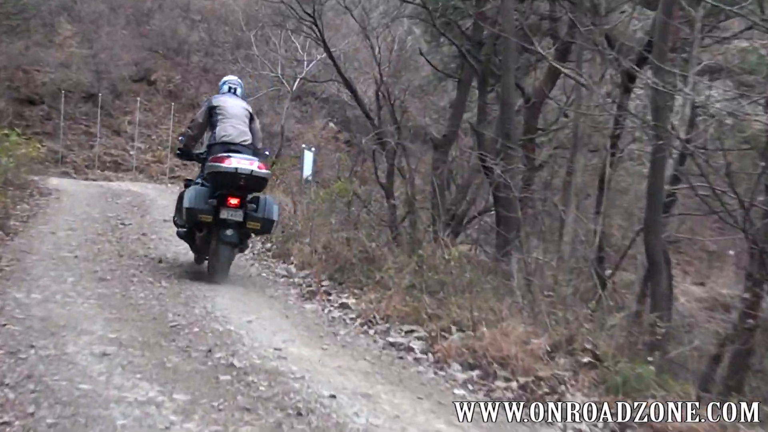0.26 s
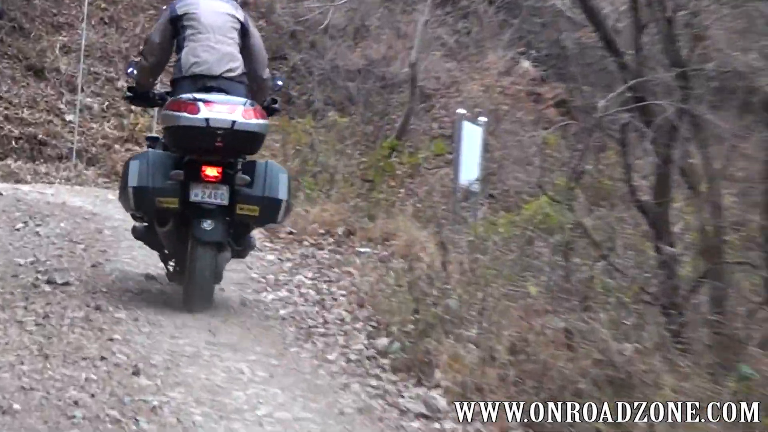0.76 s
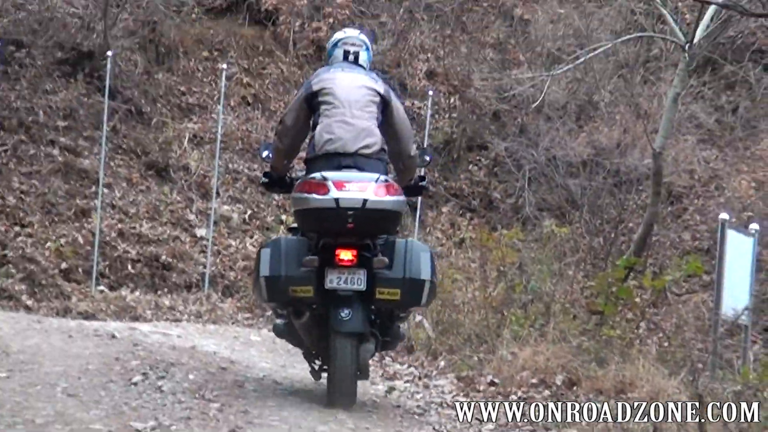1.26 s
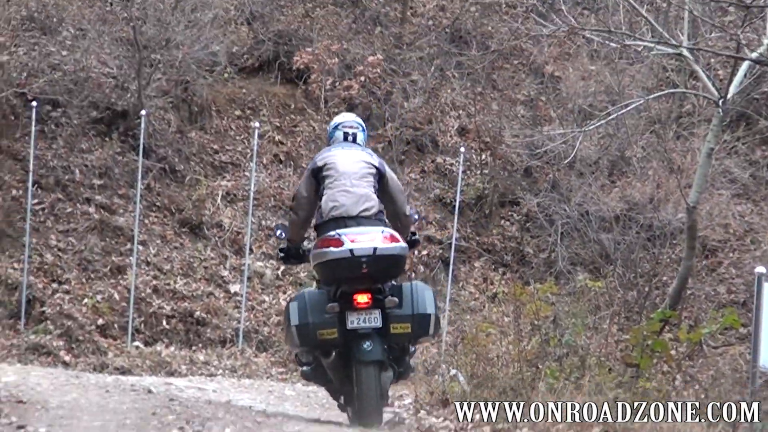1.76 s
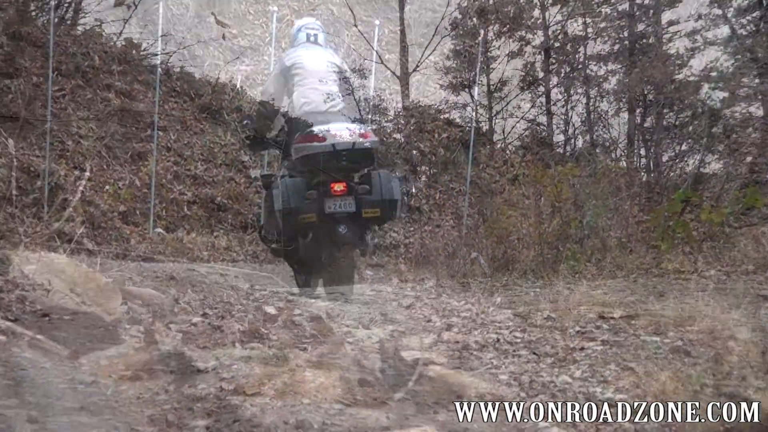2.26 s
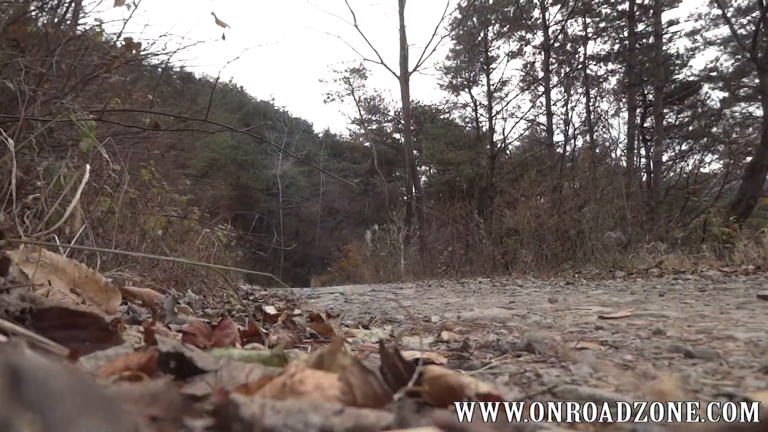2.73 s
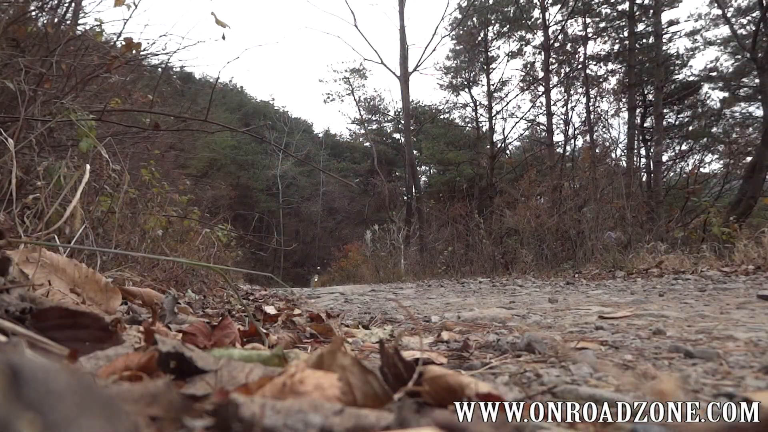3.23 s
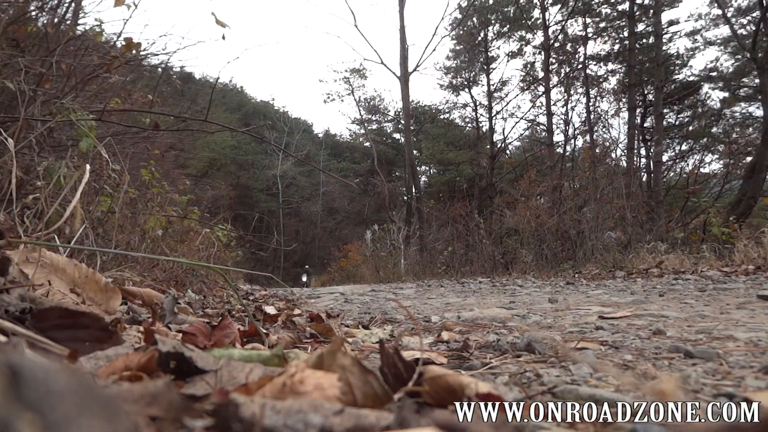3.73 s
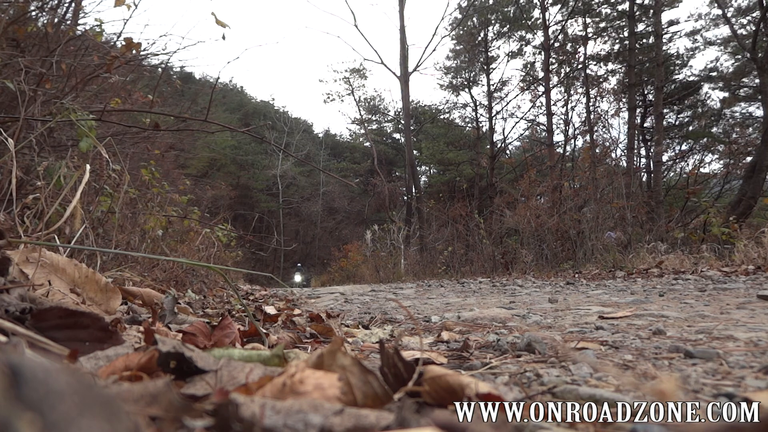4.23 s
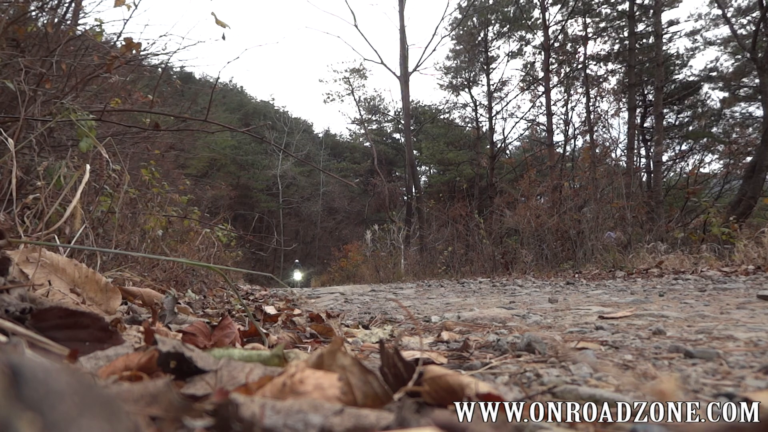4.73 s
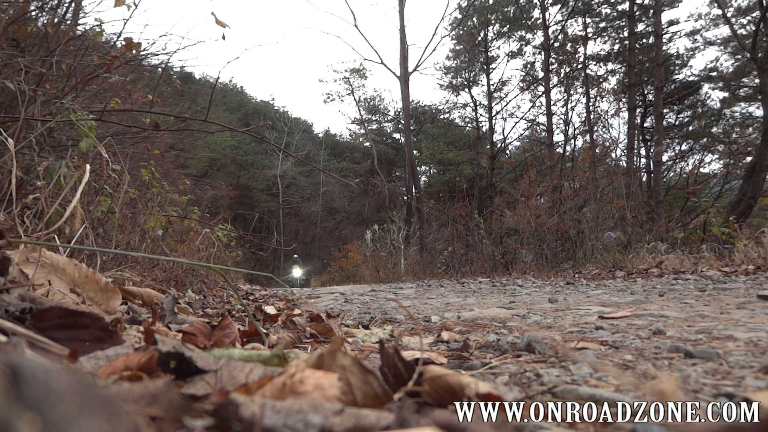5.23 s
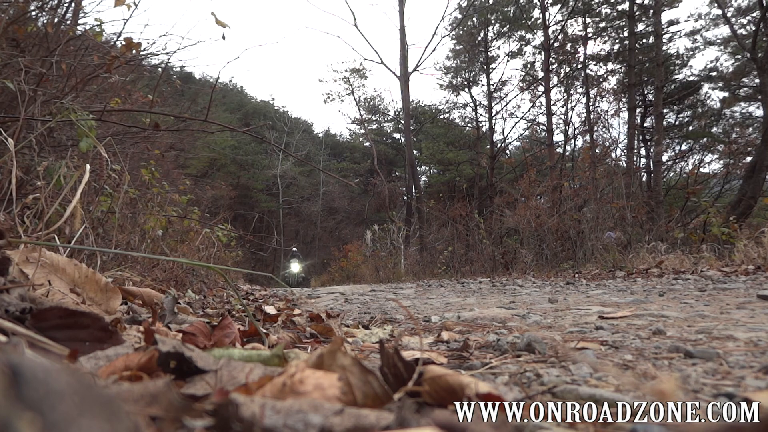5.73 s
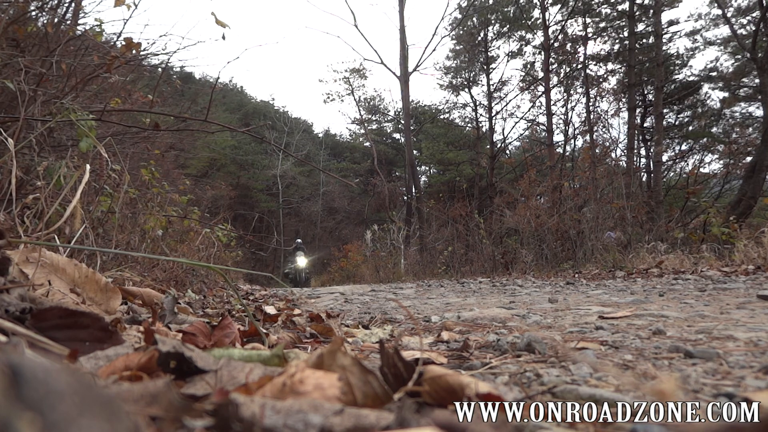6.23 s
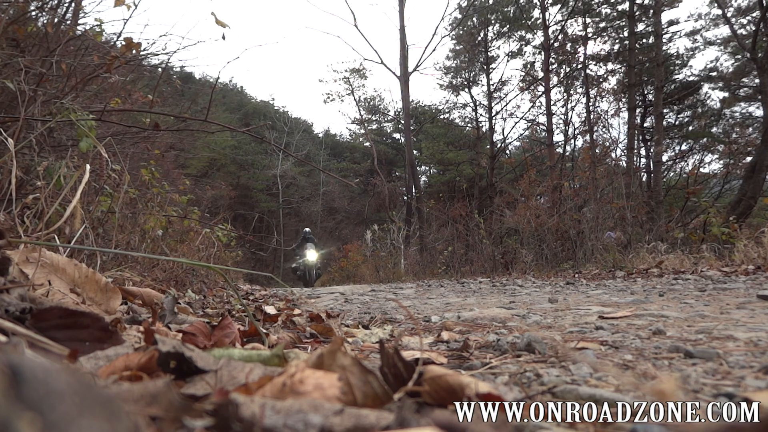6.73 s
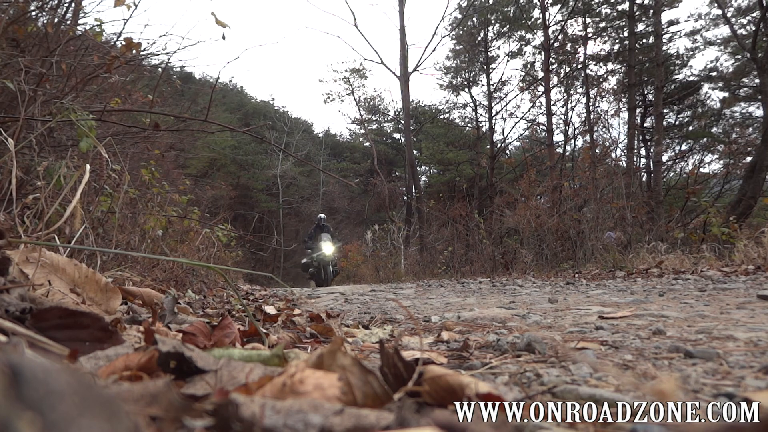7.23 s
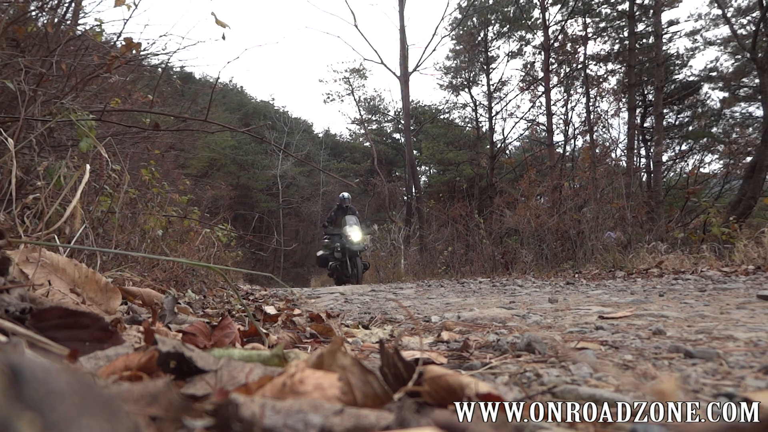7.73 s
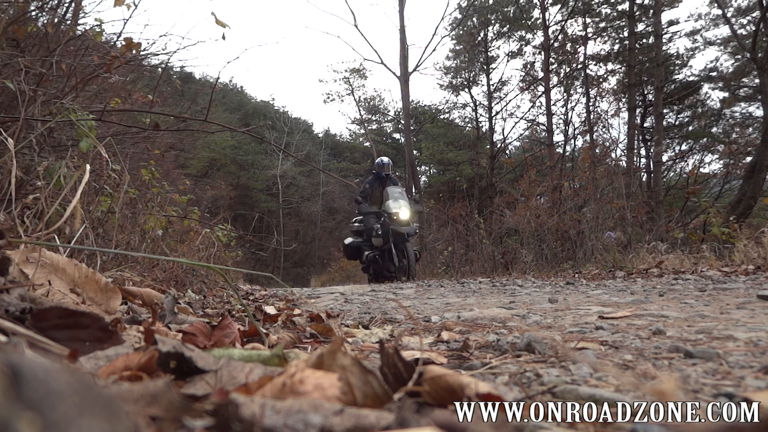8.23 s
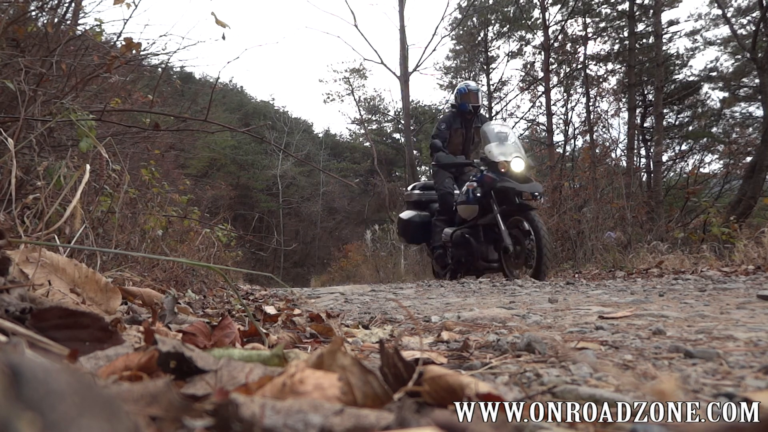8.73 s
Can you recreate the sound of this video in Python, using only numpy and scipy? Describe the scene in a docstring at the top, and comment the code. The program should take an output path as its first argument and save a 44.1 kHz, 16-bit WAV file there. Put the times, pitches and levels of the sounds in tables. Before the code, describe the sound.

A twin-cylinder motorcycle thumps away along a gravel track, then another ride approaches from far off as twigs snap close by.

```python
"""A twin-cylinder motorcycle rides away down a forest gravel track in a light wind, revs falling. Its exhaust
thumps and barks, the gears whine, metal knocks, and the tyres crunch gravel and flick stones.
From 1.86 to 2.78 s this dissolves, under a faint steady whine, into a second ride from far off.
Twigs snap close by, loudest near 4 s, while the bike revs gently and then eases back.
Near the end it comes out of the trees, its exhaust more direct and the gravel louder as it nears."""
import sys
import numpy as np
from scipy import signal
from scipy.fft import rfft, irfft, next_fast_len
from scipy.io import wavfile
from scipy.ndimage import map_coordinates

SR = 44100
rng = np.random.default_rng(int(sys.argv[2]) if len(sys.argv) > 2 else 0)


def materialize(psi):
    """Save the field psi as 16-bit PCM at rate SR to the path in sys.argv[1].

    A 1-D psi becomes a single channel; in a 2-D psi each row is a channel.
    """
    bounded = np.clip(np.atleast_2d(psi).T, -1, 1)
    quanta = np.round(bounded * 32767).astype(np.int16)
    wavfile.write(sys.argv[1], SR, quanta)


N = 395577
TIME = np.arange(N) / SR
DISSOLVE_START_S, DISSOLVE_END_S = 1.86, 2.78

# How hard the engine pulls on each ride. Each row: time in seconds, throttle in dB,
# second cylinder against the first in dB.
THROTTLE_AWAY = [(0, -1, -4.5), (.8, 0.5, -5), (1.15, -1, -8.5), (2.25, 1, -17.5), (2.5, 1.5, -5)]
THROTTLE_TOWARD = [(3.2, -7.5, -11), (3.75, -3, 0), (5, -0.5, -11), (7.1, 3.5, -12.5), (7.45, -1, -8.5),
                   (7.8, 1.5, -18), (8.97, -0.5, -10)]


def amp(db):
    """Decibels to gain."""
    return 10 ** (np.asarray(db) / 20)


def unit(x):
    """Scale to rms 1."""
    return x / np.sqrt(np.mean(x ** 2) + 1e-20)


def along(points, hz):
    """Read (Hz, value) points on a log frequency axis."""
    point_hz, values = np.transpose(points)
    return np.interp(np.log(hz + 1), np.log(point_hz + 1), values)


def curves(rows):
    """An automation curve for each column after the time."""
    times, *columns = np.transpose(rows)
    return [np.interp(TIME, times, column) for column in columns]


def wobble(rate):
    """A smooth random curve, rate knots a second."""
    return map_coordinates(rng.standard_normal(int(N * rate / SR) + 4), [TIME * rate])


def lift_db(modes, hz):
    """The boost or cut from a set of bell-shaped bands."""
    return sum(db / (1 + (2 * (hz - centre) / width) ** 2) for centre, width, db in modes)


def filtered(x, response):
    """Apply a frequency response to x."""
    size = next_fast_len(x.shape[-1] + SR // 4)
    return irfft(rfft(x, size) * response(np.fft.rfftfreq(size, 1 / SR)), size)[..., :x.shape[-1]]


def coloured(x, spectrum):
    """Shape x with an EQ curve of (Hz, dB) points, at rms 1."""
    return unit(filtered(x, lambda hz: amp(along(spectrum, hz))))


def spread(pair, side_db):
    """Two unrelated signals as the mid and side of a stereo pair."""
    return pair[0] + amp(side_db) * np.array([pair[1], -pair[1]])


def placed(x, left_db, lead_us):
    """A sound from one side is louder and earlier in that channel."""
    sides = np.array([[1], [-1]]) / 2
    return filtered(x, lambda hz: amp(sides * left_db) * np.exp(2j * np.pi * hz * sides * lead_us / 1e6))


def add(track, start_s, sound):
    """Mix a short sound into the track."""
    part = track[max(0, round(start_s * SR)):][:len(sound)]
    part += sound[:len(part)]


def dissolve(away, toward):
    """The first ride fades out evenly as the second fades in."""
    share = np.interp(TIME, [DISSOLVE_START_S, DISSOLVE_END_S], [0, 1])
    return away * (1 - share) + toward * share


def closeness():
    """How far the second ride has come out of the trees, 0 to 1."""
    return np.interp(TIME, [6.7, 7.9], [0, 1])


def forest_air():
    """A faint, steady bed of dark noise."""
    spectrum = [(20, -19), (70, -1), (150, 11.5), (800, -0.5), (3000, -4), (6000, -9.5), (15000, -30)]
    return amp(-60) * spread(coloured(rng.standard_normal((2, N)), spectrum), side_db=-3.5)


def breeze():
    """A light, gusting wind rumbles on the microphones."""
    # The wind's strength between gusts. Each row: time in seconds, level in dB.
    wind = [(0, -25), (.9, -34), (1.08, -31), (2.13, -32), (2.3, -32)]
    spectrum = [(10, 5.5), (30, -13.5), (80, -6.5), (160, -6.5), (500, -52)]
    rumble = coloured(rng.standard_normal((2, N)), spectrum)
    return amp(curves(wind)[0] + 2 * wobble(6.1)) * spread(rumble, side_db=-6)


def faint_whine(pitch_hz=868, width_hz=60):
    """A narrow band of noise at a steady pitch hangs over the dissolve."""
    # Its swell and fade. Each row: time in seconds, level in dB.
    fader = [(1.8, -87), (2.2, -53), (2.75, -67), (3.4, -63), (4, -90)]
    phase = 2 * np.pi * pitch_hz * TIME
    whine = wobble(width_hz) * np.cos(phase) + wobble(width_hz) * np.sin(phase)
    return amp(curves(fader)[0]) * unit(whine)


def forest_echo(x, lowest_hz, hops=7):
    """Trunks and hillside scatter a tail that changes as the bike moves; long waves pass them by."""
    # The tail's length. Each row: frequency in Hz, seconds to fall 60 dB.
    decay = [(100, 1), (400, 0.45), (2000, 0.16), (10000, 0.056)]
    scattered = filtered(x, lambda hz: hz ** 2 / (hz ** 2 + lowest_hz ** 2))
    scattered = np.pad(scattered, (300, 0))[:N]  # 7 ms of pre-delay
    out, hop = np.zeros((2, N + 2 * SR)), N // hops + 1
    for start in range(-hop, N, hop):  # a fresh tail for each overlapping stretch
        at = np.arange(max(start, 0), min(start + 2 * hop, N))
        hz, t, noise = signal.stft(rng.standard_normal((2, SR // 2)), SR, nperseg=256)
        tail = signal.istft(noise * amp(-60 * t / along(decay, hz)[:, None]), SR, nperseg=256)[1]
        tail = spread(tail / np.linalg.norm(tail[0]), side_db=-13)
        window = np.sin(np.pi * (at - start) / (2 * hop))
        wet = signal.fftconvolve((scattered[at] * window)[None], tail, axes=1)
        out[:, at[0]:at[0] + wet.shape[1]] += wet
    return out[:, :N]


def twig_snaps(width_cycles=0.57, tail_db=-11, tail_s=0.0016, lowest_hz=500):
    """Twigs and dry leaves snap: each a tiny pitched click with a faint scatter off the ground."""
    # Each row: time in seconds, level in dB, pitch in Hz.
    snaps = [(2.807, -35.5, 4880), (3.946, -8, 1540), (4.246, -31, 4740)]
    out, t = np.zeros(N), TIME[:SR // 12] - .002  # the click is centred on t = 0
    for s, db, pitch_hz in snaps:
        click = -np.sin(2 * np.pi * pitch_hz * t) * np.exp(-(t * pitch_hz / width_cycles) ** 2)
        noise = rng.standard_normal(len(t))
        scatter = unit(filtered(noise, lambda hz: 1 / (1 + 3 * np.log2((hz + 1) / pitch_hz) ** 4)))
        tail = amp(tail_db) * scatter * (t > 0) * np.exp(-abs(t) / tail_s)
        add(out, s + t[0], amp(db) * (click + tail))
    return filtered(out, lambda hz: hz ** 2 / (hz ** 2 + lowest_hz ** 2))


def ground_dip(x):
    """The bounce off the track cancels a band that moves with the angle to the tyres."""
    # The dip riding away, far ahead and close ahead. Each row: centre in Hz, width in Hz, gain in dB.
    dip_away = [(1450, 600, -6)]
    dip_far = [(4050, 2900, -3.5)]
    dip_near = [(5360, 1220, -10)]
    away, far, near = (filtered(x, lambda hz: amp(lift_db(dip, hz)))
                       for dip in (dip_away, dip_far, dip_near))
    return np.where(TIME < DISSOLVE_END_S, away, far + (near - far) * closeness())


def tyre_gains(layers, throttle, metres, drive):
    """Rumble, crunch and grit fall with distance; the first two also follow throttle and ground."""
    # Loose or packed gravel. Each row: centre and length in seconds, rumble and crunch change in dB.
    patches = [(1.315, 0.058, -9, 6.5), (1.79, 0.11, -6, 3), (2.414, 0.9, -3, -6.5), (6.11, 0.22, 4.5, -3),
               (6.29, 0.14, 5.5, 2), (6.484, 0.17, 0, -11), (6.688, 0.12, 1.5, 2), (6.93, 0.035, 3, -11),
               (7.083, 0.26, -1.5, 1.5), (7.314, 0.13, 4.5, 4.5), (7.496, 0.21, 4, 4),
               (7.616, 0.15, 3, 6.5), (8.21, 0.06, 2, 6), (8.654, 0.028, 8.5, 7.5), (8.76, 0.13, 2, 4)]
    rumble_db, crunch_db, grit_db = (db - loss_db * np.log2(metres / 10) for db, loss_db in layers)
    drive_db = drive * curves(throttle)[0]
    for s, length_s, extra_rumble_db, extra_crunch_db in patches:
        swell = np.exp(-(2 * (TIME - s) / length_s) ** 2)
        rumble_db += extra_rumble_db * swell
        crunch_db += extra_crunch_db * swell
    return amp([rumble_db + drive_db, crunch_db + drive_db, grit_db])


def grains(rate, spread_db, life_s):
    """Two streams of tiny stone contacts: mostly faint, a few strong."""
    hits = (rng.random((2, N)) < rate / SR) * amp(spread_db * np.minimum(rng.exponential(size=(2, N)), 4))
    power = signal.fftconvolve(hits ** 2, np.exp(-TIME[None, :SR // 20] / life_s), axes=1)[:, :N]
    return np.sqrt(abs(power)) * rng.standard_normal((2, N))


def tyres(rumble_gain, crunch_gain, grit_gain, first_cutoff_hz=10500, second_cutoff_hz=13000):
    """Rolling on gravel: dull rumble, clumpy crunch and a low-passed hiss of grit that opens up late."""
    # The colour of each layer. Each row: frequency in Hz, relative level in dB.
    rumble_eq = [(30, -37), (100, -14), (250, -5), (500, 1.5), (800, -5.5), (1100, -2), (1400, -10.5),
                 (2200, -12.5), (5000, -34)]
    crunch_eq = [(500, -20.5), (1200, -0.5), (1600, 0.5), (2050, 2.5), (2500, -7.5), (3100, -4),
                 (4200, -11.5), (5500, -15.5), (7500, -22), (10000, -20.5), (15000, -99)]
    grit_eq = [(3000, -2), (5300, 6), (6500, 2.5), (8500, 0.5), (10500, 1), (12300, 4.5), (15000, 5),
               (16000, -3)]
    clumps = wobble(22)
    rumble = spread(coloured(grains(rate=450, spread_db=1.5, life_s=0.0055), rumble_eq), side_db=-7)
    crunch = spread(coloured(grains(rate=380, spread_db=2.3, life_s=0.003), crunch_eq), side_db=-10)
    grit = spread(coloured(grains(rate=1900, spread_db=1, life_s=0.0046), grit_eq), side_db=-36.5)
    dull = filtered(grit, lambda hz: 1 / (1 + (hz / first_cutoff_hz) ** 8))
    brighter = filtered(grit, lambda hz: 1 / (1 + (hz / second_cutoff_hz) ** 16))
    return (rumble_gain * amp(0.43 * clumps) * rumble
            + crunch_gain * amp(0.89 * clumps) * crunch
            + grit_gain * dissolve(dull, brighter + (grit - brighter) * closeness()))


def pebbles(crunch_gain, count=48, over_db=9, scatter_db=-2, sharp_db=-11, spray_db=5, lowest_hz=1900):
    """Rows for stones(): small ones flicked at random, their level riding on the crunch around them."""
    rows = []
    for when, smallness, octave in rng.random((count, 3)):
        db = 20 * np.log10(crunch_gain[int(when * N)]) + over_db + scatter_db * smallness
        rows.append((when * N / SR, db, sharp_db, spray_db, lowest_hz * 2 ** octave))
    return rows


def stones(crunch_gain, ring_s=0.0017, spray_s=0.013, clack_db=1.4, crack_db=4.5):
    """Each stone clacks at a pitch set by its size, cracks and sets off a spray of smaller ones."""
    # The largest stones the tyres squeeze out. Each row: start in seconds, relative level in dB,
    # crack trim in dB, spray in dB, ring in Hz.
    large_stones = [(1.035, -9, -7, -44, 1860), (1.211, -18.5, -28, -8, 2900),
                    (1.2938, -17.5, -17, -4, 2180), (1.315, -18, -22, -2, 2500),
                    (1.4524, -23, -16, -22, 4000), (1.4968, -14, -17.5, -8, 2720),
                    (1.5005, -19, -22, -21, 1900), (1.675, -20, -19, -4, 4040), (1.7548, -20, -20, 9, 2490),
                    (1.8106, -22, -14, -13, 3220), (1.851, -21.5, -12.5, -3, 3020),
                    (2.4867, -28, -34, -14, 1070), (6.013, -30.5, -21, -12, 1200),
                    (6.1477, -26.5, -22, -6, 1190), (6.246, -33, -28, -4, 1090),
                    (6.2789, -23.5, -25, -3, 1140), (6.302, -35, -13, -2, 1050),
                    (6.9321, -25, -38, -4, 1170), (7.325, -31, -28, 4, 1700), (7.622, -27, -27, 5, 2100),
                    (7.7543, -22.5, -11, 2, 1910), (8.402, -25, -35, -17, 2210),
                    (8.6422, -19.5, -27, -12, 1790), (8.7545, -17.5, -18, -19, 3800),
                    (8.8214, -13, -29, -17, 1390), (8.904, -13.5, -36, -13, 1510),
                    (8.9395, -11, -15, -2, 1420)]
    # The dull clack and the sharp crack. Each row: frequency in Hz, relative level in dB.
    clack_eq = [(200, -4.5), (700, 6), (1200, 3.5), (2000, -3), (3300, -6.5), (6000, -27), (12000, -40)]
    crack_eq = [(1500, -15), (3500, 0), (6000, 10), (9000, 1), (15000, -38)]
    out, t = np.zeros(N), TIME[:SR // 12]
    for s, db, sharp_db, spray_db, ring_hz in list(large_stones) + pebbles(crunch_gain):
        fade = np.exp(-t / ring_s) + amp(spray_db) * np.exp(-t / spray_s)
        ring = [(ring_hz, 0.63 * ring_hz, 9)]  # a broad 9 dB resonance
        clack = coloured(rng.standard_normal(len(t)), clack_eq)
        clack = fade * filtered(clack, lambda hz: amp(lift_db(ring, hz)))
        crack = fade * coloured(rng.standard_normal(len(t)), crack_eq)
        add(out, s, amp(db + clack_db) * clack / abs(clack).max())
        add(out, s, amp(db + sharp_db + crack_db) * crack / abs(crack).max())
    return out


def metal_knocks(gain_db=5.5):
    """Short metallic knocks ring from the bike as it rides away, their modes in a new balance each time."""
    # The knocks. Each row: start in seconds, relative peak in dB.
    knocks = [(0.2129, -23.5), (0.3368, -15.5), (0.433, -27.5), (0.8259, -22), (0.9886, -24),
              (1.0909, -23.5)]
    # The metal's modes. Each row: pitch in Hz, relative level in dB, seconds to fall 60 dB.
    modes = [(1930, 1, .018), (2090, 0, .016), (2890, -9, .012), (4110, -6, .013), (5700, -13, .009)]
    out, t = np.zeros(N), TIME[:SR // 12]
    for s, db in knocks:
        ring = np.zeros(len(t))
        for hz, mode_db, t60 in modes:
            fade = amp(mode_db + rng.normal(0, 0.75) - 60 * t / t60)
            ring += fade * np.sin(2 * np.pi * hz * t + rng.uniform(0, 2 * np.pi))
        add(out, s, amp(db + gain_db) * ring / abs(ring).max())
    return out


def gears(speed, throttle, metres, first_s, level_db, surge_db, width_hz, drive,
          mesh_ratio=51.5, surge_s=0.012):
    """Meshing teeth give a rasping whine that tracks the revs, surges each cycle and grows with throttle."""
    # The resonance where the gearbox sings. Each row: centre in Hz, width in Hz, boost in dB.
    gearbox = [(1051, 130, 10)]
    rate, = curves(speed)
    turn = 2 * np.pi * np.cumsum(rate) / SR
    whine = wobble(width_hz) * np.cos(mesh_ratio * turn) + wobble(width_hz) * np.sin(mesh_ratio * turn)
    whine_db = level_db + drive * curves(throttle)[0] + lift_db(gearbox, mesh_ratio * rate)
    surge = amp(surge_db * np.cos(turn - np.interp(first_s + surge_s, TIME, turn)))
    return amp(whine_db) * 10 / metres * unit(whine * surge)


def firings(speed, throttle, metres, first_s, lag_cycles, scatter_db):
    """Two firings a cycle, the second weaker, less steady and a little late; both fall with distance."""
    # Firings that fail to catch. Each row: time in seconds, level change in dB.
    misfires = [(.175, -8), (.745, -15), (.873, -7.5), (1.44, -3.5), (2.276, -24)]
    cycles = np.cumsum(curves(speed)[0]) / SR
    cycles -= np.interp(first_s, TIME, cycles)
    level_db, second_db = curves(throttle)
    level_db += sum(db * (abs(TIME - s) < .008) for s, db in misfires)
    cylinders = (0, level_db, scatter_db), (lag_cycles, level_db + second_db, 2 * scatter_db)
    train = np.zeros(N)
    for offset, size_db, jitter_db in cylinders:
        at = np.flatnonzero(np.diff(np.floor(cycles - offset)) > 0)
        train[at] = amp(size_db[at] + jitter_db * rng.standard_normal(len(at)))
    return train * 10 / metres


def pipe_tuning(speed, heat, unsteady, nominal_cycles_per_s=20):
    """The pipe's pitch ratio: hotter gas at higher revs raises it, and it wavers from beat to beat."""
    return (curves(speed)[0] / nominal_cycles_per_s) ** heat * (1 + unsteady * wobble(35))


def bark(train, tuning, level_db=-25, ring_hz=425, delay_s=.004, swell_s=.003, unsteady=.025):
    """The silencer rings just after each firing; its pitch sags with the revs and varies by the beat."""
    out, t = np.zeros(N), TIME[:SR // 25]
    swell = t / swell_s * np.exp(1 - t / swell_s)
    for at in np.flatnonzero(train):
        hz = ring_hz * tuning[at] ** 3 * (1 + unsteady * rng.standard_normal())
        add(out, at / SR + delay_s, train[at] * np.sin(2 * np.pi * hz * t) * swell)
    return amp(level_db) * out


def thump(spectrum, modes, chamber_hz=460, size=16384):
    """The pressure pulse of one firing, with the energy of 15 ms at rms 1."""
    hz = np.fft.rfftfreq(size, 1 / SR)
    cepstrum = irfft(np.log(amp(along(spectrum, hz) + lift_db(modes, hz))))
    cepstrum[1:size // 2] *= 2  # minimum phase: the hit first, then the ring
    cepstrum[size // 2:] = 0
    # the silencer's chamber lets the lows out later than the highs
    chamber = (chamber_hz - 1j * hz) / (chamber_hz + 1j * hz)
    pulse = irfft(np.exp(rfft(cepstrum)) * chamber)[:size // 2]
    return -pulse / np.sqrt(np.sum(pulse ** 2) / (.015 * SR))


def exhaust(train, tuning, spectrum, modes, thump_db, puff_db, puff_s):
    """Each firing thumps the pipe at its momentary tuning and pushes a short puff of gas through it."""
    # The rushing gas. Each row: frequency in Hz before tuning, relative level in dB.
    puff_eq = [(20, -29), (60, -39), (150, -5.5), (300, 1), (450, -0.5), (700, -3.5), (1000, -7.5),
               (1500, -30), (2100, -16), (4000, -24), (12000, -38)]
    t = TIME[:SR // 8]
    gate = signal.fftconvolve(train, np.exp(-t / puff_s) * (1 - np.exp(-t / 0.0022)))[:N]
    noise = rng.standard_normal(2 * N)
    gas = filtered(noise, lambda hz: amp(along(puff_eq, hz) + 0.33 * lift_db(modes, hz)))
    gas = unit(map_coordinates(gas, [np.cumsum(tuning)]))  # bend it with the pipe's pitch
    pulse, thumps = thump(spectrum, modes)[:len(t)], np.zeros(N)
    for at in np.flatnonzero(train):
        add(thumps, at / SR, train[at] * np.interp(t * tuning[at], t, pulse))
    return amp(thump_db) * thumps + amp(puff_db) * gate * gas


def ride_away(metres, first_s=.056):
    """The engine from behind, revs falling, its exhaust pointing back at the listener."""
    # The revs. Each row: time in seconds, four-stroke cycles per second.
    speed = [(0, 25.63), (.43, 24.85), (.92, 23.1), (1.27, 20.1), (1.83, 18.34), (1.94, 18.74),
             (2.24, 17.09), (2.8, 16.95)]
    # One pulse from behind. Each row: frequency in Hz before tuning, relative level in dB.
    thump_eq = [(15, -29), (35, -9), (55, -14), (100, -7), (200, -8), (310, -8), (430, -10.5), (550, -27),
                (720, -22.5), (1000, -33), (2500, -49.5), (8000, -57.5)]
    # Pipe resonances. Each row: centre and width in Hz before tuning, boost in dB.
    modes = [(75, 27, 8), (145.2, 41, 14), (200.3, 36, 2), (231.6, 54, 10.5), (290, 27, -9),
             (432, 190, 2.5), (689, 45, 10.5)]
    train = firings(speed, THROTTLE_AWAY, metres, first_s, lag_cycles=.511, scatter_db=0.77)
    tuning = pipe_tuning(speed, heat=.22, unsteady=.012)
    engine = exhaust(train, tuning, thump_eq, modes, thump_db=-15.6, puff_db=-31, puff_s=0.014)
    engine += bark(train, tuning)
    engine += gears(speed, THROTTLE_AWAY, metres, first_s,
                    level_db=-51.5, surge_db=-2.5, width_hz=70, drive=4.8)
    return engine + forest_echo(amp(-11.5) * engine, lowest_hz=287)


def ride_toward(metres, first_s=2.8418):
    """The engine from the front, heard through the forest at first, then more directly."""
    # The revs. Each row: time in seconds, four-stroke cycles per second.
    speed = [(2.7, 16.17), (3.4, 17.12), (4.09, 19.17), (5.21, 21.18), (5.95, 20.17), (6.28, 20.79),
             (6.38, 18.5), (6.64, 18.67), (6.71, 19.65), (7.92, 17.09), (8.85, 16.59), (8.97, 14.84)]
    # One pulse from the front. Each row: frequency in Hz before tuning, relative level in dB.
    thump_eq = [(15, -23), (42, -19), (58, -2.5), (100, -2.5), (190, -5.5), (280, -3), (345, 7.5),
                (460, -2.5), (700, -5.5), (820, -29.5), (1100, -8), (2500, -36), (8000, -55)]
    # Pipe resonances from far and near. Each row: centre and width in Hz before tuning, boost in dB.
    far_modes = [(148.1, 40, 18.3), (225.5, 53, 16.1), (392.6, 41, 11.4), (523, 41, 8.8), (665, 40, 8.4)]
    near_modes = [(144.5, 46, 21.6), (211.6, 66, 22.2), (306, 27, 7.3), (395, 35, 13.8), (514, 36, 4.7),
                  (680, 95, 16)]
    train = firings(speed, THROTTLE_TOWARD, metres, first_s, lag_cycles=.508, scatter_db=0.5)
    tuning = pipe_tuning(speed, heat=.33, unsteady=.008)
    close = closeness()
    far = exhaust(train * (1 - close), tuning, thump_eq, far_modes,
                  thump_db=-31, puff_db=-44.5, puff_s=0.016)
    near = exhaust(train * close, tuning, thump_eq, near_modes, thump_db=-31, puff_db=-35.5, puff_s=0.018)
    whine = gears(speed, THROTTLE_TOWARD, metres, first_s,
                  level_db=-54.5, surge_db=4, width_hz=110, drive=1)
    pipe = far + near
    return pipe + amp(-8 * close) * whine + forest_echo(amp(-8.5) * pipe, lowest_hz=284)


def scene():
    """The first ride lies a little left, the second straight ahead; twigs snap nearby in faint air."""
    # Tyre rumble, crunch and grit. Each row: base level in dB at 10 m, dB lost per doubling of distance.
    tyres_away = [(-37, 2), (-37.5, 2.5), (-49, 9)]
    tyres_toward = [(-39, 6.8), (-45.5, 11.4), (-46.5, 10.5)]
    start_m, away_m_per_s = 5.86, 3.12
    toward_m_per_s, pass_s, pass_m = 5.92, 9.56, 1.5  # the sound ends just before the bike would pass
    away_m = start_m + away_m_per_s * TIME
    toward_m = np.hypot(toward_m_per_s * (pass_s - TIME), pass_m)
    rumble_gain, crunch_gain, grit_gain = dissolve(
        tyre_gains(tyres_away, THROTTLE_AWAY, away_m, drive=0.34),
        tyre_gains(tyres_toward, THROTTLE_TOWARD, toward_m, drive=1))
    clatter = stones(crunch_gain) + metal_knocks()
    twigs = twig_snaps()
    air = forest_air()
    echo = forest_echo(amp(-14.5) * clatter + amp(-27) * twigs, lowest_hz=300)
    gravel = ground_dip(clatter + tyres(rumble_gain, crunch_gain, grit_gain)) + echo
    away = placed(ride_away(away_m) + breeze() + gravel, left_db=1, lead_us=36.4)
    toward = ride_toward(toward_m) + gravel
    return dissolve(away, toward) + placed(twigs, left_db=-3, lead_us=17) + faint_whine() + air


def record(dry, top_hz=15900):
    """A brick-wall low-pass takes off the very top."""
    return filtered(dry, lambda hz: hz < top_hz)


dry = scene()
out = record(dry)
materialize(out)
```